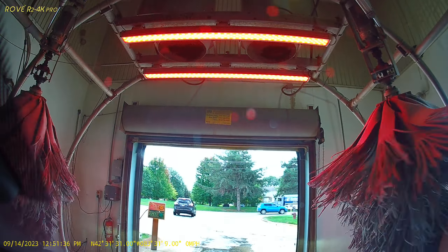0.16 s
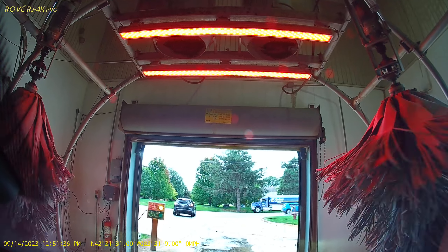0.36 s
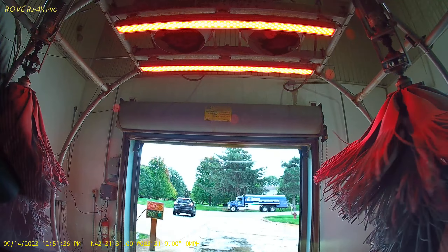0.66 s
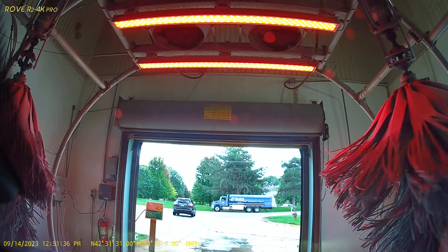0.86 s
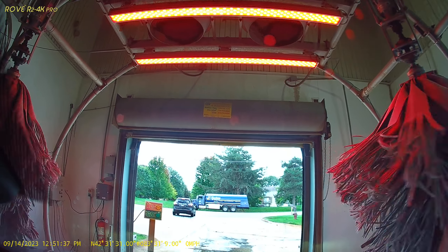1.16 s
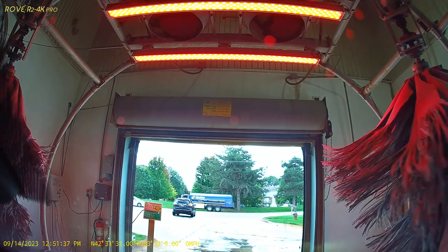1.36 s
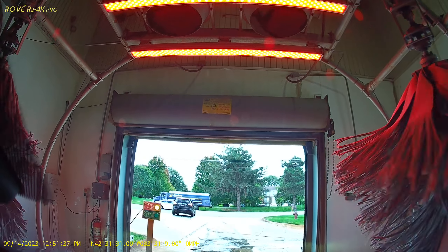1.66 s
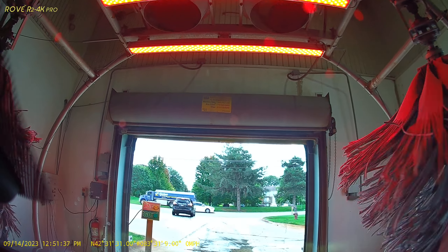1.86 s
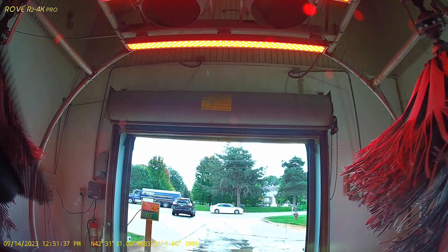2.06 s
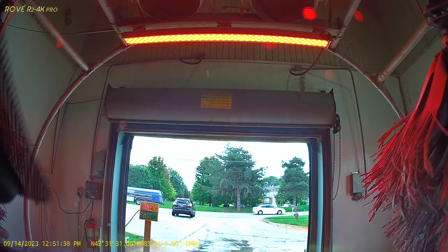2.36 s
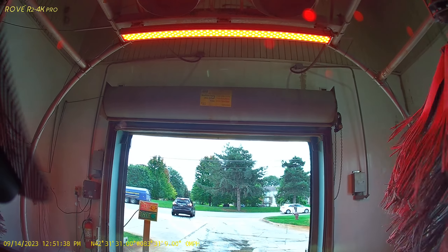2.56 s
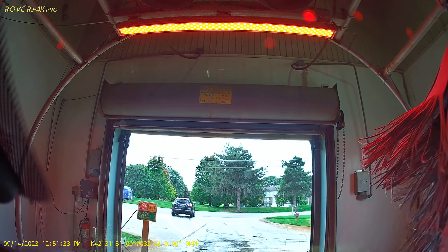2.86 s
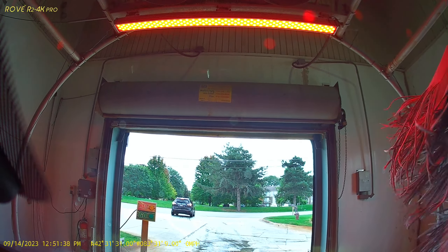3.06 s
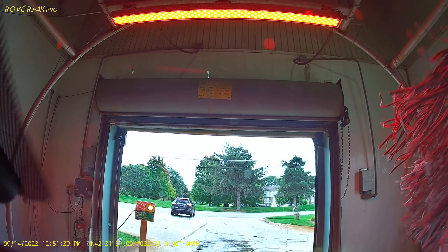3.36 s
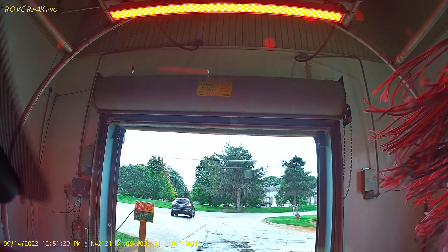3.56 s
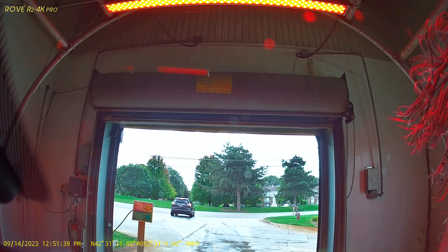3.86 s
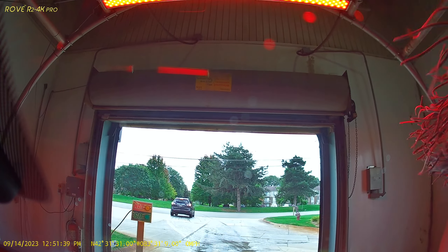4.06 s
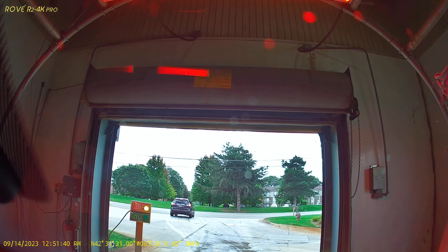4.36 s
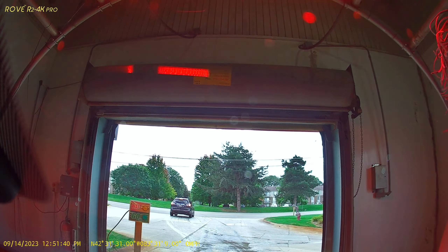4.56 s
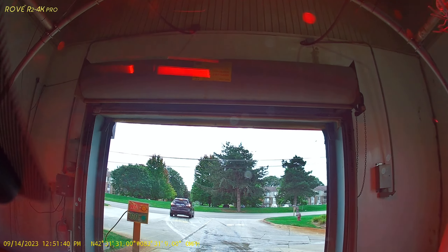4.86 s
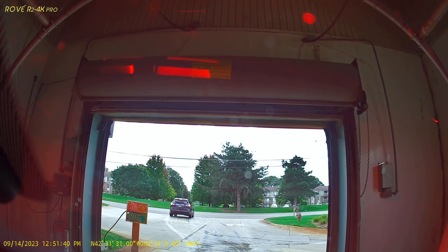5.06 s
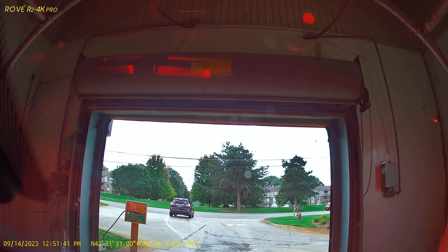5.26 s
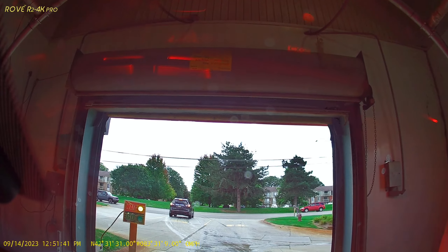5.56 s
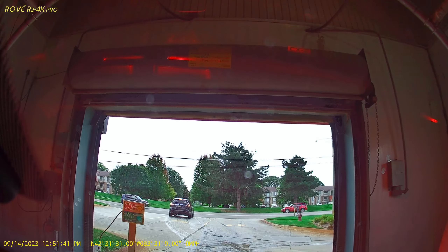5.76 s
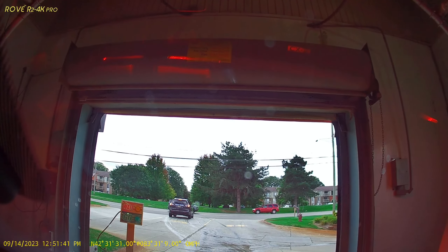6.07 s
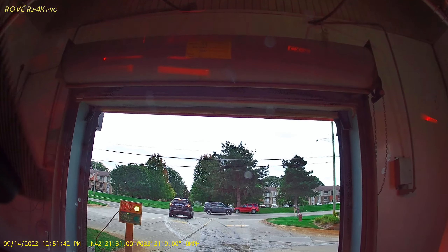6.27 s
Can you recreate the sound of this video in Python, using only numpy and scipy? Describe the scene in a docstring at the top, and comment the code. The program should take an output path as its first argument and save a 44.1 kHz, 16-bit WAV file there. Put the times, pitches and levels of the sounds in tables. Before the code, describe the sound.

From inside a car, automatic car wash blowers rush and hiss over the glass while the body rumbles and softly thumps.

```python
"""A gust roars on the windscreen over a low boom: car wash dryers, heard in a car with the windows shut.
As the car creeps under them, the jets ring the glass and ducts, rush over the windows and hiss at the
seals. Their eddies make the cabin air boom and the panels drum, and now and then thump the roof.
Fan blades hum through the wash bay, and one faint spit of water hits the glass."""
import sys
import numpy as np
from scipy import signal
from scipy.fft import rfft, irfft
from scipy.io import wavfile

SR = 44100
rng = np.random.default_rng(int(sys.argv[2]) if len(sys.argv) > 2 else 0)


def digitize_waveform(pressure):
    """Quantize a signal to 16-bit integers and store it at the path in sys.argv[1].

    Rows of a 2-D input are taken as channels; values are limited to [-1, 1].
    """
    field = np.atleast_2d(pressure).T
    bounded = np.clip(field, -1, 1)
    quanta = np.round(bounded * 32767).astype(np.int16)
    wavfile.write(sys.argv[1], SR, quanta)


N = 282924
TIME_S = np.arange(N) / SR
BINS_HZ = np.maximum(np.arange(N // 2 + 1) * SR / N, 1e-3)


def undb(db):
    """Decibels to gain."""
    return 10 ** (np.asarray(db) / 20)


def unit(x):
    """Scale to rms 1."""
    return x / np.sqrt(np.mean(x ** 2))


def curve(points):
    """Straight lines through (time, value) points."""
    return np.interp(TIME_S, *np.transpose(points))


def swell(middle_s, length_s):
    """Smooth rise to 1 and fall to 0."""
    return np.cos(np.pi * np.clip((TIME_S - middle_s) / length_s, -.5, .5)) ** 2


def gust(middle_s, length_s, max_edge_s=0.11):
    """A jet arrives, holds and leaves; brief ones are more abrupt."""
    edge_s = min(max_edge_s, length_s / 2)
    return np.clip((length_s / 2 - np.abs(TIME_S - middle_s)) / edge_s + .5, 0, 1)


def noise(response):
    """White noise through a frequency response."""
    return irfft(rfft(rng.standard_normal(N)) * response, N)


def turbulence(spectrum):
    """Noise shaped by (frequency, density) points, falling away below the first; rms 1."""
    hz, db = np.transpose(spectrum)
    response = undb(np.interp(np.log(BINS_HZ), np.log(hz), db))
    low_cut = np.minimum(BINS_HZ / hz[0], 1) ** 2
    return unit(noise(response * low_cut))


def resonance(hz, width_hz):
    """Steep band-pass: one resonance applied twice."""
    return (1 + 1j * (BINS_HZ ** 2 - hz ** 2) / (BINS_HZ * width_hz)) ** -2


def band(hz, width_hz):
    """One noise-driven resonance; rms 1."""
    return unit(noise(resonance(hz, width_hz)))


def ring(modes):
    """Modes, each shaken by its own eddies; rms 1."""
    return unit(sum(undb(db) * noise(resonance(hz, width_hz)) for hz, width_hz, db in modes))


def walk(rate_hz):
    """Smooth random motion up to about rate_hz; rms 1."""
    return unit(noise(np.exp(-(BINS_HZ / rate_hz) ** 2)))


def steady(x, window_s):
    """Even out slow swells to a running rms of 1."""
    window = signal.windows.hann(int(window_s * SR))
    power = signal.fftconvolve(x ** 2, window, "same") / signal.fftconvolve(np.ones(N), window, "same")
    return x / np.sqrt(power)


# windscreen and duct resonances: (frequency [Hz], width [Hz], relative level [dB])
GLASS_DUCT_MODES = [(382, 162, 3.5), (481.7, 76, -3.5), (637, 160, -6.5), (737.3, 117, -3), (1044, 85, -12)]

def roar(eddy_db=1.5, eddy_hz=7):
    """Small eddies ring the windscreen and ducts; the leading resonance shifts as the jets wander."""
    modes = sum(undb(db + eddy_db * walk(eddy_hz)) * band(hz, width_hz)
                for hz, width_hz, db in GLASS_DUCT_MODES)
    return steady(modes, window_s=0.3)


# turbulence through the glass: (frequency [Hz], relative density [dB])
RUSH_SPECTRUM = [(400, -0.5), (650, -0.5), (880, 0.5), (1150, 1.5), (1600, -3.5), (2100, -8.5), (2800, -16),
                 (4000, -35), (6000, -40.5)]

def rush():
    """Broad turbulence, heard through the glass."""
    return turbulence(RUSH_SPECTRUM)


# air past the window seals: (frequency [Hz], relative density [dB])
SEAL_SPECTRUM = [(1200, -8.5), (2200, 0), (3000, 1.5), (4000, 0.5), (5000, -3.5), (6000, -4.5),
                 (7000, -7.5), (7700, -12.5), (8500, -31)]
# edge whistles: (middle [s], length [s], frequency [Hz], width [Hz], level re hiss [dB])
EDGE_WHISTLES = [(0.9, 0.97, 3940, 300, -11), (4.35, 1.0, 2850, 1120, -7)]

def hiss():
    """Air shears along the seals and whistles faintly while a jet crosses an edge."""
    whistles = sum(undb(db) * gust(middle_s, length_s) * band(hz, width_hz)
                   for middle_s, length_s, hz, width_hz, db in EDGE_WHISTLES)
    return turbulence(SEAL_SPECTRUM) + whistles


# stream strength as the car creeps under the nozzles: (time [s], level [dB])
STREAM_LEVEL = [(0, -56), (.45, -56.5), (1.0, -55.5), (1.6, -55.5), (1.95, -53.5), (3.1, -55),
                (3.55, -53.5), (3.85, -54.5), (4.5, -53.5), (5.1, -53), (6.42, -54.5)]
# a jet swings on (+) or slips off (-): (middle [s], length [s], rush [dB], roar [dB], hiss [dB])
JET_GUSTS = [(0.007, 0.09, 5.5, 1.5, 4.5), (0.67, 0.12, 2, 2.5, 2), (1.073, 0.34, 1.3, 2, 1.6),
             (1.566, 0.065, -1.7, -5, -3.5), (1.75, 0.16, -1.8, -2, -3.5), (1.934, 0.2, 0, 0.3, -1.2),
             (2.164, 0.1, 1.5, 2.5, -0.5), (2.45, 0.11, 1, 1.5, 0), (2.98, 0.11, 3.5, 3.5, 1.5),
             (3.17, 0.13, 3, 3, 1), (3.337, 0.18, -2, -2, -3.5), (3.468, 0.059, -1.6, -2.5, -1.5),
             (3.65, 0.16, -2.5, -3.5, -2.5), (3.797, 0.017, 6, 4, 2.5), (4.138, 0.16, 3.5, 5.5, 3),
             (4.434, 0.11, 1.7, 2.5, 1), (4.69, 0.25, 4, 3, 3.1), (5.176, 0.018, 3, 2.5, -0.5),
             (5.517, 0.02, -5.5, -6, -6), (5.696, 0.096, -1.5, -2, -1), (5.903, 0.084, 2.5, 4.5, 2.5),
             (6.194, 0.084, 2.5, 2.5, 1)]

def jets(roar_db=9.5, hiss_db=-10.5, spread_s=0.21, wander_db=0.63, flutter_db=0.68):
    """One gusting stream drives rush, roar and hiss; returns their sound and the small panels' drive."""
    stream_db = curve(STREAM_LEVEL)
    gust_rush_db, gust_roar_db, gust_hiss_db = sum(
        np.outer(changes_db, gust(middle_s, length_s)) for middle_s, length_s, *changes_db in JET_GUSTS)
    early = np.exp(-TIME_S / spread_s)  # jets land on the windscreen, then spread to the side seals
    air = rush() * undb(gust_rush_db)
    air += roar() * undb(roar_db + 6.5 * early + gust_roar_db)
    air += hiss() * undb(hiss_db - 4 * early + gust_hiss_db)
    flicker_db = wander_db * walk(rate_hz=8) + flutter_db * walk(rate_hz=50)  # jets wander and flap
    drive_db = stream_db + 6 * early + .45 * gust_roar_db
    return air * undb(stream_db + flicker_db), drive_db


# cabin air modes: (frequency [Hz], width [Hz], relative level [dB])
BOOM_MODES = [(31.5, 17.8, 2), (47.8, 14.8, 3)]
# roof, bonnet and door modes: (frequency [Hz], width [Hz], relative level [dB])
DRUM_MODES = [(75, 40, -4.5), (104.1, 31.3, -0.5), (131.6, 33.3, 1.5), (174.2, 73, -5.5), (231.8, 64.7, -6)]
# pressure swells (+) or slackens (-): (middle [s], length [s], boom [dB], drum [dB])
BODY_BUFFETS = [(.56, 0.26, 4, 0.5), (0.977, 0.35, 3, -1.5), (1.303, 0.057, -7, -1), (1.47, 0.12, 5, -1),
                (1.675, 0.15, 5.5, -3), (2.005, 0.51, -3, 1), (2.242, 0.023, 10, 8),
                (2.482, 0.097, -7, 1.5), (2.902, 0.31, -2.5, 2.5), (3.024, 0.074, 9, 1),
                (3.11, 0.075, -11, 1.5), (3.238, 0.13, 9, 0.5), (3.42, 0.44, 0, -1.5),
                (4.041, 0.13, -15, -4.5), (4.119, 0.11, 3, 2), (4.226, 0.22, 6, 1), (4.35, 0.14, -3, 0.5),
                (4.73, 0.35, 1.5, 4), (5.014, 0.078, 3, -7), (5.303, 0.049, 6, -1), (5.513, 0.059, -16, -8),
                (5.543, 0.069, 10.5, -3), (5.652, 0.062, 1.5, 4), (5.967, 0.057, 9, 1),
                (6.072, 0.075, 9.5, -1.5), (6.247, 0.1, 3.5, 5.5), (6.406, 0.15, 6, -4)]

def body(drive_db, eddy_hz=6, split_hz=161, fade_db_per_s=0.43):
    """Large eddies press on the car: cabin air booms, panels drum and the pressure sways slowly."""
    boom_db = -32.5 + 1.5 * walk(eddy_hz)
    drum_db = 1.16 * walk(eddy_hz)
    for middle_s, length_s, boom_change_db, drum_change_db in BODY_BUFFETS:
        push = swell(middle_s, length_s)
        boom_db += boom_change_db * push
        drum_db += drum_change_db * push
    boom = steady(ring(BOOM_MODES), window_s=0.24) * undb(boom_db)
    panels = steady(ring(DRUM_MODES), window_s=0.35) * undb(drum_db)
    large_panels = irfft(rfft(panels) / (1 + (BINS_HZ / split_hz) ** 10), N)
    small_panels = panels - large_panels
    drum = large_panels * undb(-35.5 - fade_db_per_s * TIME_S)  # the jets move back off them
    drum += small_panels * undb(17 + drive_db)
    sway = band(hz=5.6, width_hz=11) * undb(-51)
    return boom + drum + sway


# blade tones: (multiple of shaft speed [-])
BLADE_ORDERS = [8, 11, 12, 16, 24]
# one per blade tone: (base level [dB])
BLADE_LEVELS = [-55.5, -66, -51, -66, -77.5]
# nearness of the fans: (time [s], gain [dB])
FAN_NEARNESS = [(0, -0.5), (.5, -12), (.85, -4.5), (1.2, -10), (1.5, -6), (2.5, -8), (3.3, -3), (3.8, 1),
                (4.15, .5), (4.45, -3.5), (4.7, 2), (5.0, -5), (5.6, 1), (6.42, -7)]

def fans(shaft_hz=58.8, drift=0.004, waver_db=4.0):
    """Blade tones waver across the moving air; the wash bay scatters each into a narrow halo."""
    hum = 0
    for order, db in zip(BLADE_ORDERS, BLADE_LEVELS):
        hz = order * shaft_hz
        phase = 2 * np.pi * np.cumsum(hz * (1 + drift * walk(rate_hz=11.3))) / SR
        direct = unit(np.sin(phase) * undb(waver_db * walk(rate_hz=12)))
        halo = band(hz, width_hz=30)
        hum += undb(db) * unit(direct + halo)
    return hum * undb(curve(FAN_NEARNESS))


# eddies bursting on the roof: (time [s], peak [dB])
ROOF_THUMPS = [(1.436, -24), (1.469, -25), (1.985, -26), (2.885, -22.5), (2.97, -25.5), (3.04, -23),
               (4.103, -28), (5.307, -24)]

def thumps(push_s=0.0053):
    """Each burst is one brief push that rings all the panels."""
    response = sum(undb(db) * resonance(hz, width_hz) ** .5 for hz, width_hz, db in DRUM_MODES)
    knocks = 0
    for at_s, peak_db in ROOF_THUMPS:
        knock = irfft(rfft(swell(at_s, push_s)) * response, N)
        knocks += undb(peak_db) * knock / np.max(np.abs(knock))
    return knocks


def spit():
    """The air flings a little spray against the windscreen."""
    return band(hz=5960, width_hz=1500) * swell(middle_s=1.548, length_s=.035) * undb(-69.5)


def scene():
    """Jets, buffeted body, fans, thumps and spray; mono."""
    air, drive_db = jets()
    return (air + body(drive_db) + fans() + thumps() + spit())[None]


def record(dry, top_hz=8500, ease_s=.003):
    """Ease both ends and cut the top treble steeply."""
    ease = np.clip(np.minimum(TIME_S, TIME_S[-1] - TIME_S) / ease_s, 0, 1)
    low_pass = signal.ellip(10, .2, 80, top_hz, fs=SR, output="sos")
    return signal.sosfilt(low_pass, dry * ease)


dry = scene()
out = record(dry)
digitize_waveform(out)
```